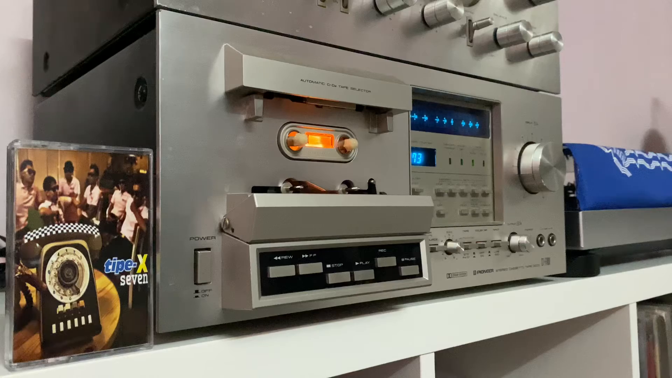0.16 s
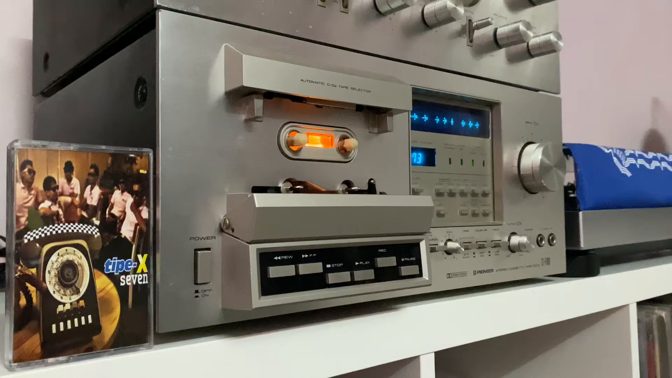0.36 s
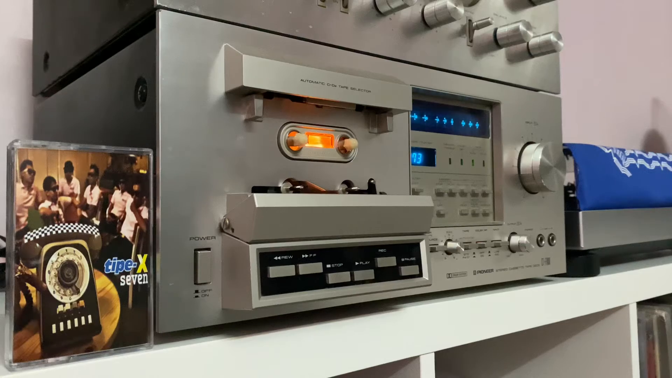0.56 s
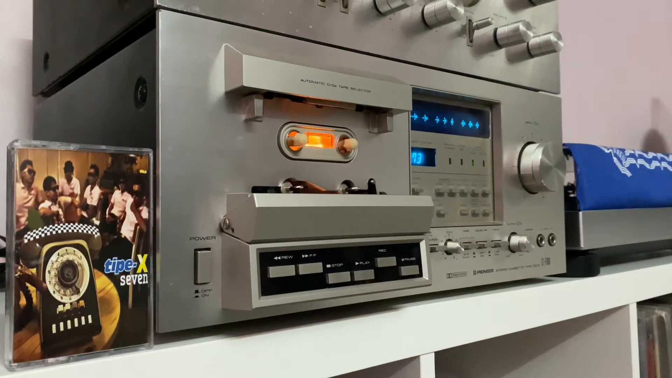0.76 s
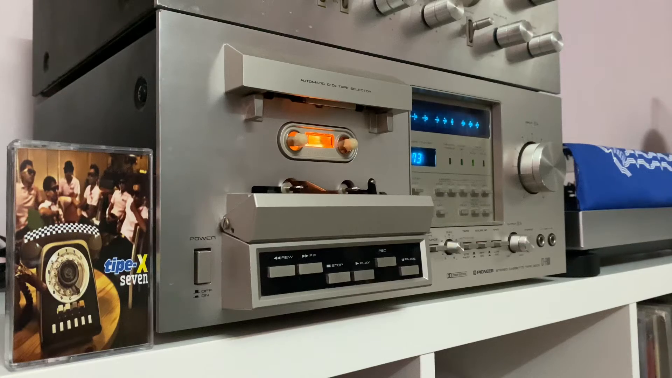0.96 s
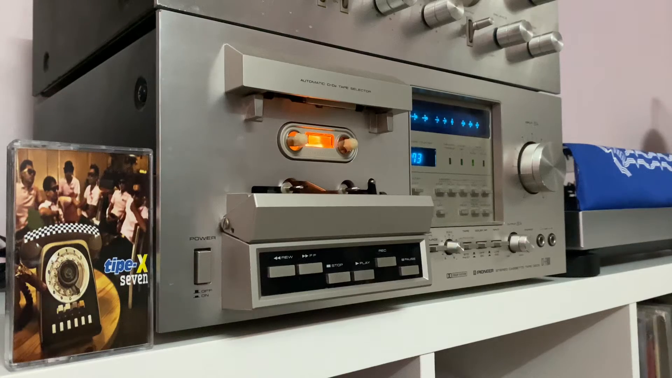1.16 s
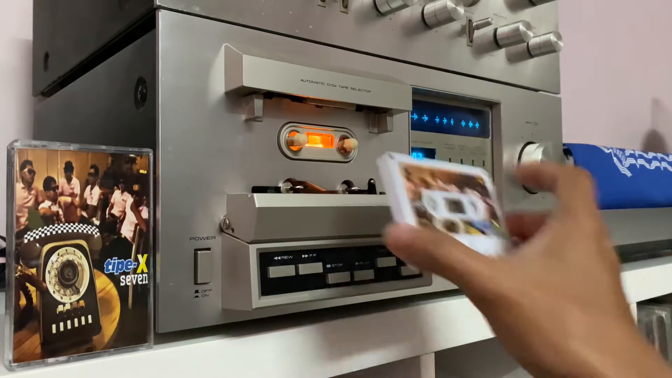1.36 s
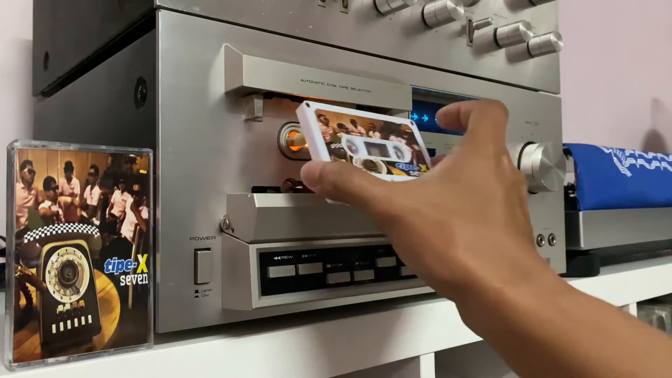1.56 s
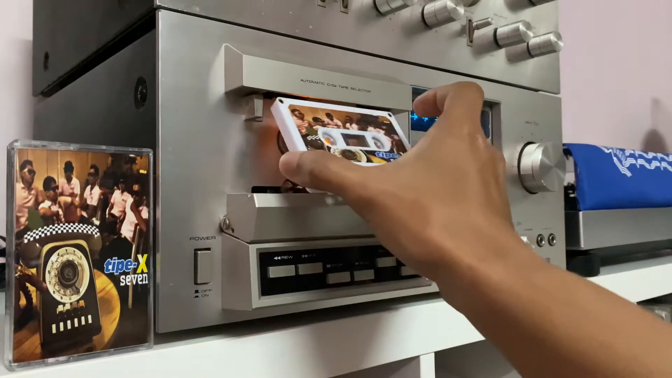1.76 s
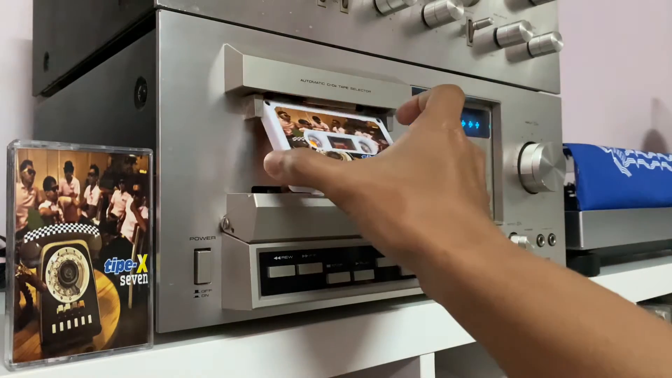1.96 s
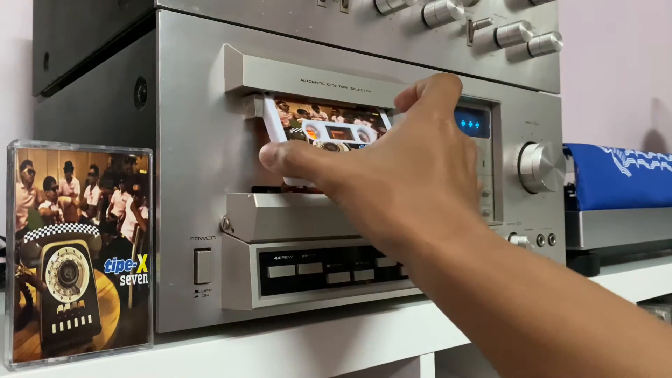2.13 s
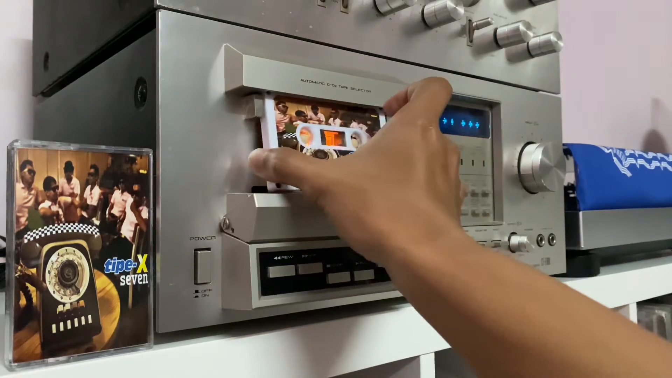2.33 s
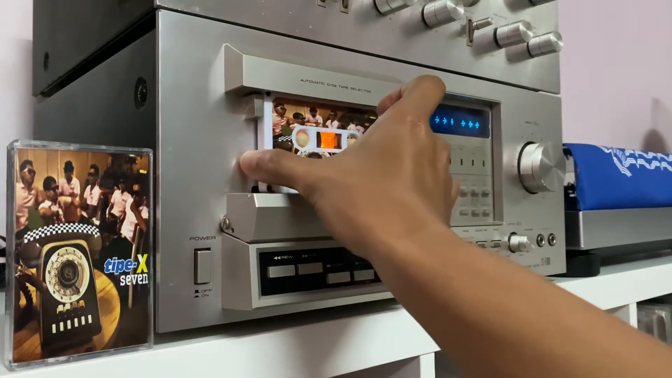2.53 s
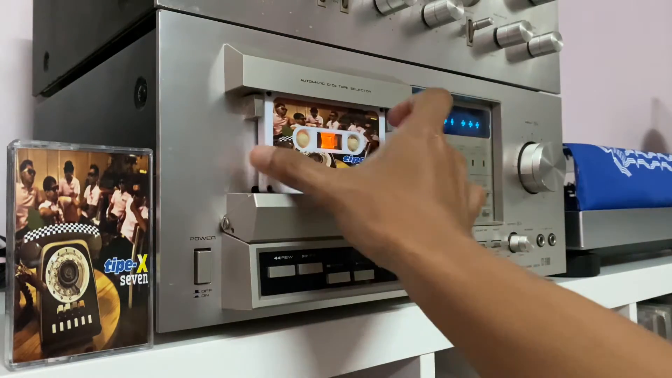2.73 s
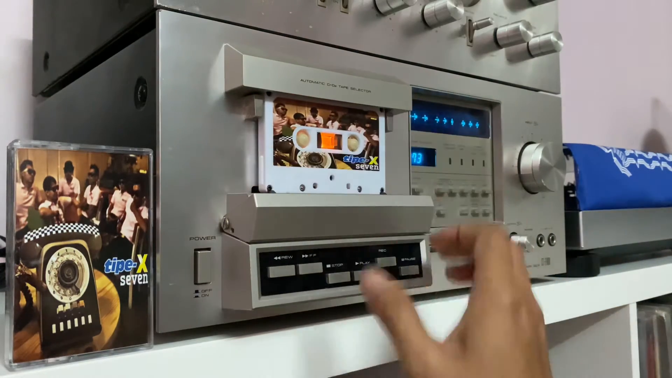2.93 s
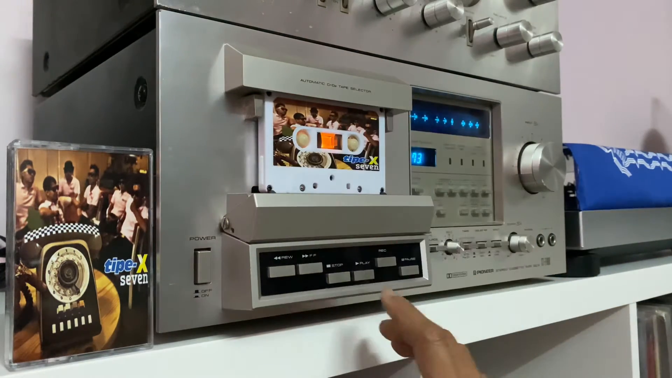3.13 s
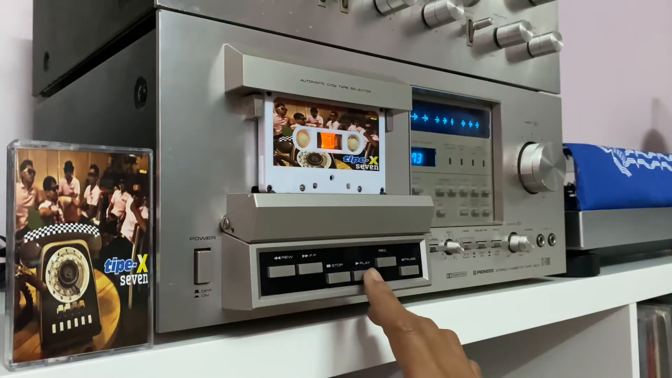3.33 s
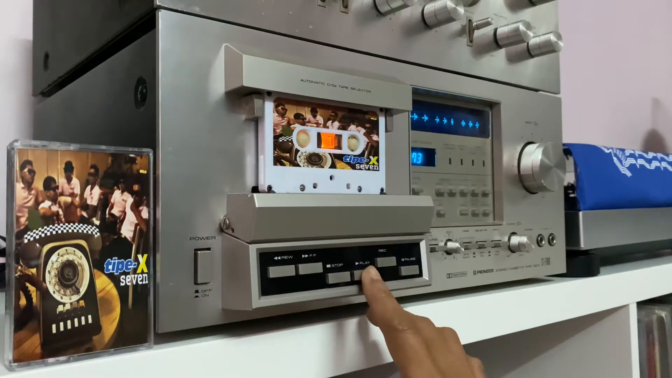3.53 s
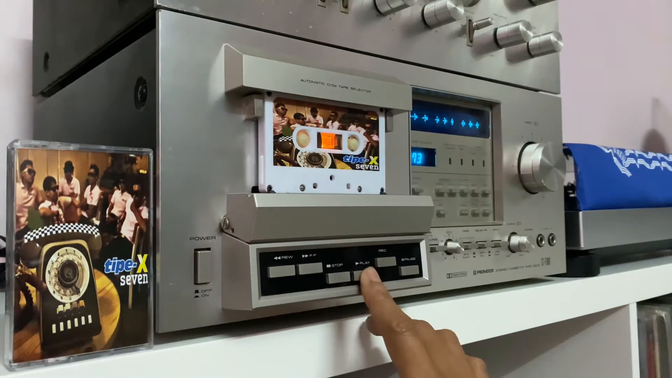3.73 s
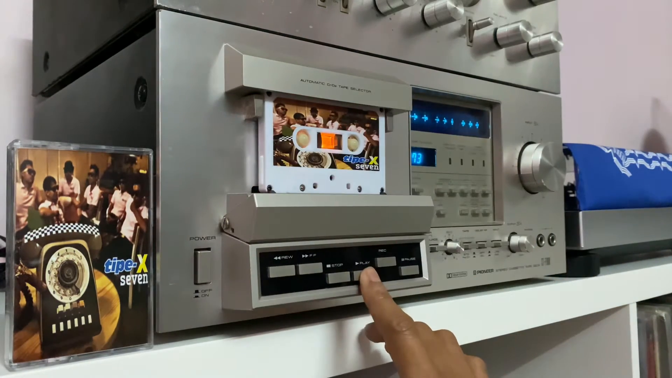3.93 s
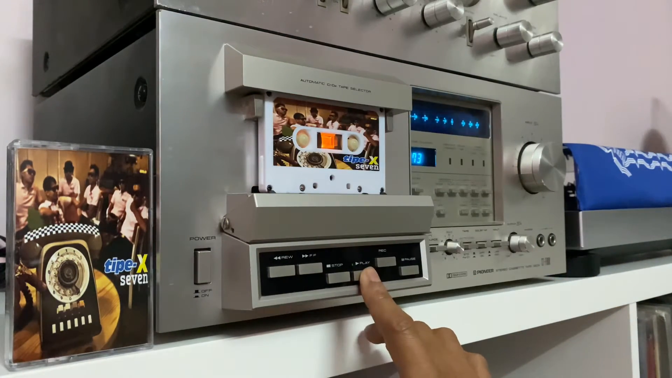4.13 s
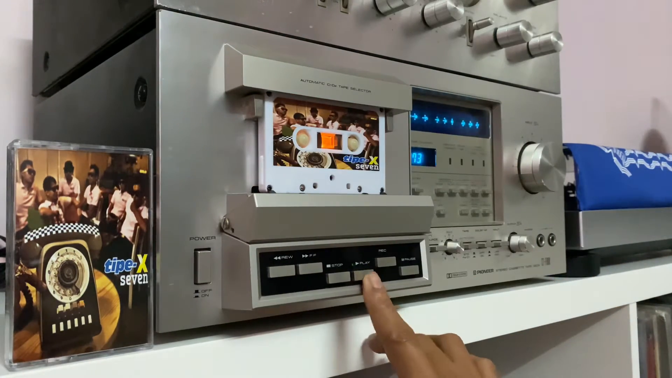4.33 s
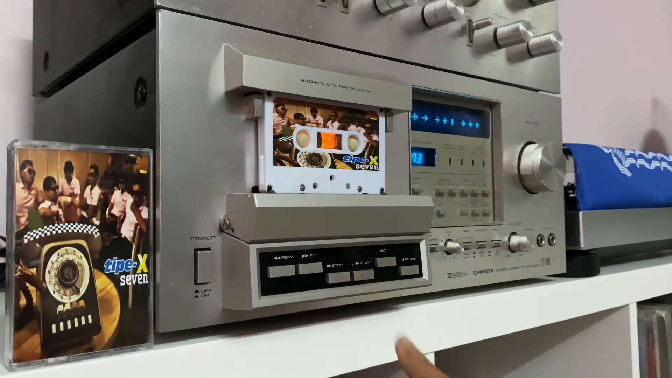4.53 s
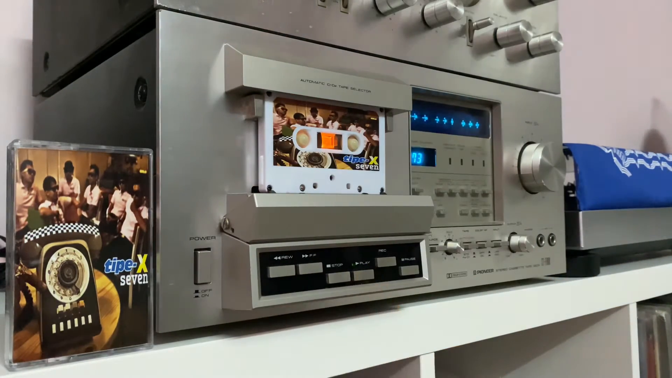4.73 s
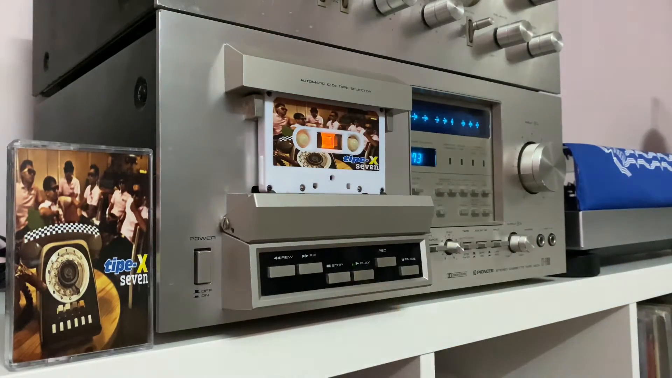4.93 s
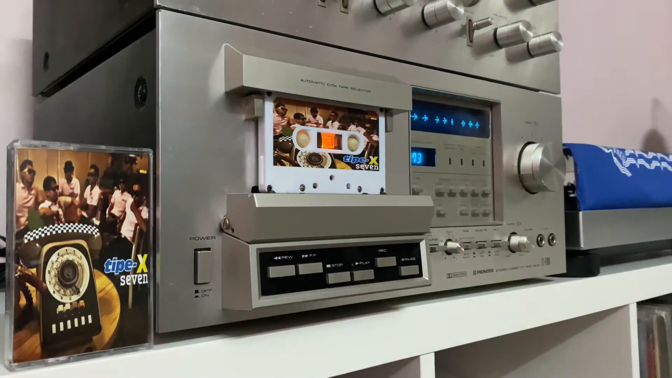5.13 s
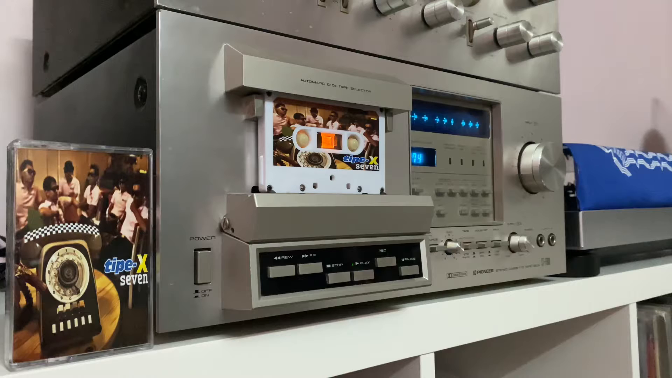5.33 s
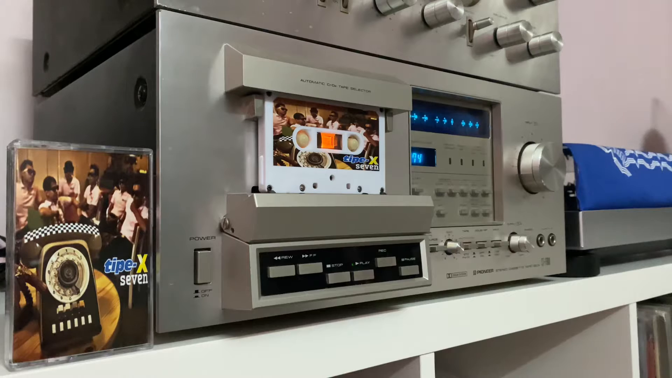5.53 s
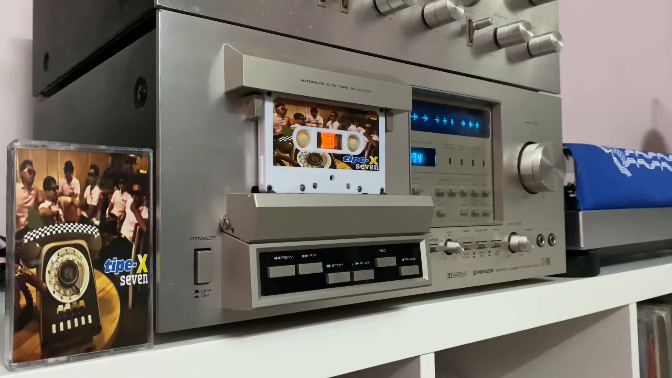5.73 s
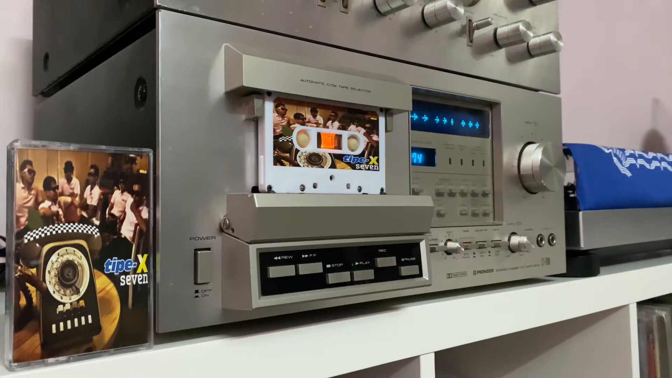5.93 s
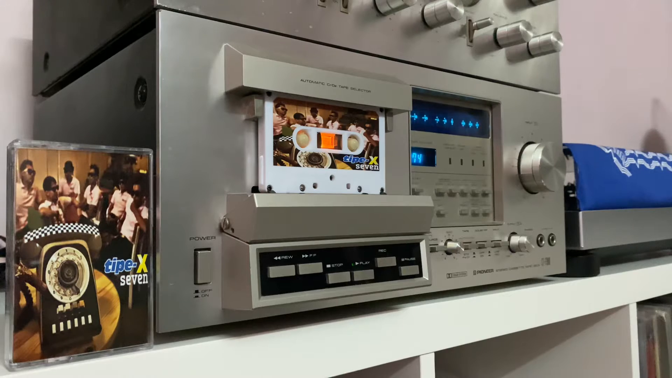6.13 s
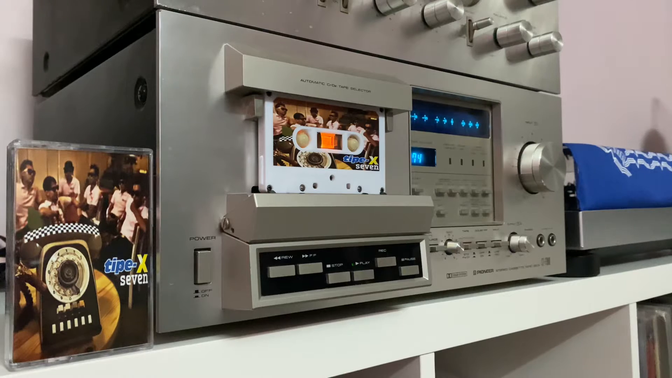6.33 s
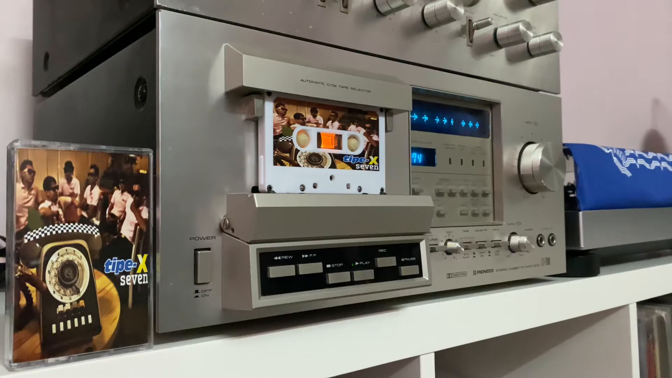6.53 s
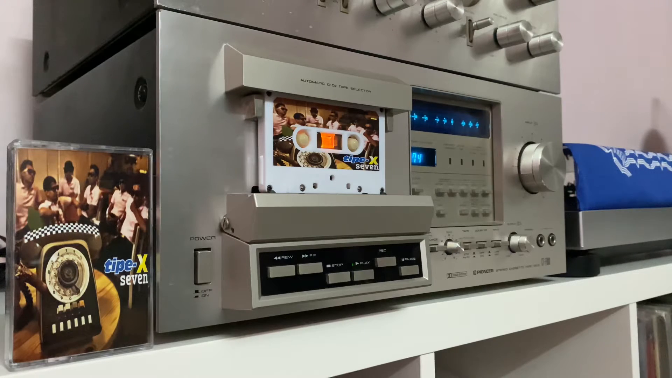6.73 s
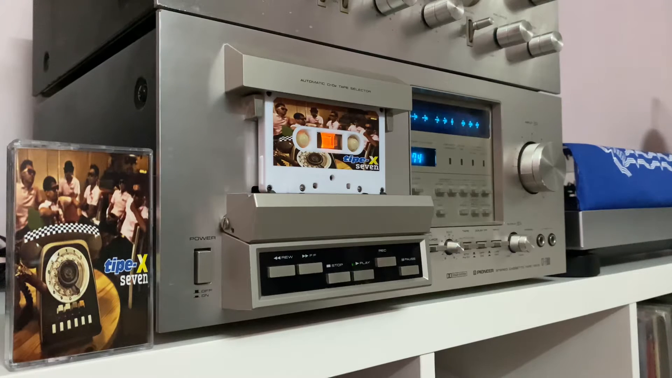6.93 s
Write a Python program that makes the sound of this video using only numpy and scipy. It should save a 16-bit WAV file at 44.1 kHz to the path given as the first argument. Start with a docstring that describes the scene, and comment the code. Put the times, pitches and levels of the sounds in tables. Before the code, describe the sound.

A plastic cassette clatters and snaps into a tape deck, a guard clunks, a key clacks down, then faint hiss and motor hum.

```python
"""A cassette is handled, slid into the open well of a tape deck and snapped home; a guard clunks shut,
a key is tapped, the head block is thrown in and tape hiss starts. Gritty pushes excite damped modes of
shell, parts, panel and cabinet; a decaying noise tail adds the small furnished room. Shaped noise gives
the low wavering rumble, murmur, hiss and motor tones. A phone close by hears it all."""
import sys
import numpy as np
from scipy import signal
from scipy.fft import rfft, irfft
from scipy.io import wavfile
from scipy.ndimage import uniform_filter1d

SR = 44100
rng = np.random.default_rng(int(sys.argv[2]) if len(sys.argv) > 2 else 0)


def put_to_file(sound):
    """Save the sound as 16-bit audio at rate SR, in the file named by the first command-line argument."""
    columns = np.atleast_2d(sound).T  # one column per channel
    safe = np.clip(columns, -1, 1)
    whole_steps = np.round(safe * 32767)
    wavfile.write(sys.argv[1], SR, whole_steps.astype(np.int16))


N = 307901
T = np.arange(N) / SR


def undb(db):
    """Level law: amplitude ratio from decibels."""
    return 10 ** (np.asarray(db) / 20)


def level(x, db):
    """Mean-square normalisation: scale to an RMS level in dB."""
    return x * undb(db) / np.sqrt(np.mean(x ** 2))


def filtered(x, order, edges_hz, kind="band"):
    """Butterworth filtering: a maximally flat pass band."""
    return signal.sosfilt(signal.butter(order, edges_hz, kind, fs=SR, output="sos"), x)


def balance(db):
    """Level difference between channels: left minus right in dB, split evenly."""
    return db * np.array([[.5], [-.5]])


def walk(rate):
    """Slow random modulation: levels held 1 / rate seconds and smoothed twice."""
    held = int(SR / rate)
    steps = np.repeat(rng.standard_normal(N // held + 1), held)
    return uniform_filter1d(uniform_filter1d(steps, held), held)[:N]


def noise(gain, alike_hz):
    """Spectral shaping of diffuse noise: left and right agree in the bass only."""
    hz = np.arange(N // 2 + 1) * SR / N + 1
    mid, side = rfft(rng.standard_normal((2, N))) * gain(hz)
    side = side * hz / (hz + alike_hz)
    return level(irfft(np.array([mid + side, mid - side]), N), 0)


def colour(table):
    """Spectral envelope: gain interpolated over log frequency from (Hz, dB) points."""
    hz, db = np.transpose(table)
    return lambda f: undb(np.interp(np.log(f), np.log(hz), db, left=-90, right=-90))


# Low background. Each row: time in seconds, rumble level in dB, murmur level in dB before its wander.
BACKGROUND_LEVELS = [(0.2, -101, -67), (0.25, -97, -68), (0.52, -73.5, -71), (0.97, -79, -65.5),
                     (1.27, -57, -64), (2.16, -72.5, -62.5), (2.39, -68, -57.5), (2.58, -60, -58.5),
                     (2.75, -74.5, -63.5), (2.969, -72, -67.5), (3.3, -77, -58), (3.541, -65, -67.5),
                     (3.981, -58, -64.5), (4.339, -78, -64), (4.58, -70, -62.5), (4.75, -74, -61.5),
                     (5.621, -58.5, -60), (6.07, -71, -61), (6.51, -57, -61.5), (6.98, -74, -60)]
# Murmur of the house. Each row: frequency in Hz, relative spectral density in dB.
HOUSE_COLOUR = [(41, -31.5), (70, -3.5), (119, -9.5), (184, -16), (300, -16), (357, -24.5), (398, -23.5),
                (575, -29), (1800, -50), (2340, -74.5), (3960, -120)]
# Steady thin hiss. Each row: frequency in Hz, relative spectral density in dB.
AIR_COLOUR = [(600, -20), (1200, 0), (2100, -3), (4100, -5), (6200, -10), (10000, -13), (12400, -14),
              (13500, -19), (16000, -25)]
AIR_DB = -86.5
RUMBLE_HZ, RUMBLE_WIDTH_HZ = 53, 13


def background():
    """Band-limited noise: a narrow rumble and a dull murmur swell separately over a steady hiss."""
    s, rumble_db, house_db = np.transpose(BACKGROUND_LEVELS)
    rumble = noise(lambda f: 1 / (1 + ((f - RUMBLE_HZ) / RUMBLE_WIDTH_HZ) ** 4), 170.0)
    house = noise(colour(HOUSE_COLOUR), 330.0)
    air = noise(colour(AIR_COLOUR), 690.0) * undb(AIR_DB)
    rumble = rumble * undb(np.interp(T, s, rumble_db))
    house = house * undb(np.interp(T, s, house_db) + walk(0.63))
    return rumble + house + air


SCATTER_DB = 2.  # random spread of each mode's strength
# Modes this far from a blow's own pitch lose 6 dB; the farthest lose no more than the second value.
FAVOURED_OCTAVES, FARTHEST_DB = .45, 9


def ring(modes, apart, swell=.0001, damp=1, near_hz=None, spread=0.0044):
    """Modal superposition: decaying sines, with strength, tuning and side phase drawn for each blow."""
    hz, db, t60 = np.transpose(modes)[:, :, None]
    t = T[:int(SR * t60.max())]
    share, drift, turn = rng.standard_normal((3, len(modes), 1))
    if near_hz:
        octaves_off = np.log2(hz / near_hz)
        db = db - np.minimum(6 * (octaves_off / FAVOURED_OCTAVES) ** 2, FARTHEST_DB)
    decay = undb(db + SCATTER_DB * share - 60 * damp * t / np.maximum(t60, .002))
    decay = decay * (1 - np.exp(-t / swell))
    phase = 2 * np.pi * hz * (1 + spread * drift) * t
    return np.array([np.sum(decay * np.sin(phase + side * apart * turn), 0) for side in (1, -1)])


GRIT_DB = 4.  # random spread of the roughness


def contact_grit(t):
    """Frictional excitation: rubbing surfaces exert a noise force of uneven strength."""
    return rng.standard_normal(len(t)) * undb(GRIT_DB * rng.standard_normal(len(t)))


HELD_SHARE = 0.12  # a contact is held for this share of its fade


def contact_push(t, grit, fade):
    """Force envelope: the gritty force rises, is held and then decays exponentially."""
    fade = max(fade, .004)
    hold = HELD_SHARE * fade
    after = np.maximum(t - hold, 0)
    rise = np.minimum(t / max(0.17 * hold, .0016), 1)
    return grit * rise * undb(-60 * after / fade)


BODY_PUSH_S = .0006  # time constant of the shove


def body_shove(t, grit):
    """Impulse excitation: the heavy body feels each contact as one short shove of random sign."""
    return np.exp(-t[:SR // 100] / BODY_PUSH_S) * np.sign(grit[0])


CRACK_HZ = (880, 6800)


def bare_crack():
    """Broadband impulse response: a click and its copy, the right side one sample late."""
    copy_delay = 3 * rng.integers(3)  # samples
    return filtered(np.eye(2, 200) + np.eye(2, 200, copy_delay), 1, CRACK_HZ)


THUD_HZ, THUD_T60_S = (148, 657), 0.15


def body_thud(t):
    """High modal density: the toneless part of the body's answer is decaying noise."""
    t = t[:SR // 10]
    burst = rng.standard_normal(len(t)) * undb(-60 * t / THUD_T60_S)
    return filtered(burst, 2, THUD_HZ) * np.ones((2, 1))


BUZZ_HZ, BUZZ_T60_S = (900, 9000), .3
BUZZ_UNEVEN_DB, BUZZ_STEP_S = 4., .006


def loose_buzz(t):
    """Irregular contact noise: loose parts buzz tonelessly and die away unevenly."""
    buzz = filtered(rng.standard_normal((2, len(t))), 1, BUZZ_HZ)
    steps = np.arange(0, t[-1], BUZZ_STEP_S)
    uneven_db = BUZZ_UNEVEN_DB * np.interp(t, steps, rng.standard_normal(len(steps)))
    return buzz * undb(uneven_db - 60 * t / BUZZ_T60_S) * (1 - np.exp(-t / .004))


# Nominal modes of five bodies; each blow scatters strength and tuning, and damping may shorten the decay.
# Plastic shell and its guides. Each row: frequency in Hz, relative level in dB, 60 dB decay in seconds.
SHELL_MODES = [(690, -13, .012), (817, -8, .012), (965, -5.5, 0.0057), (1115, -3, .02), (1330, -11, .012),
               (1428, 0, 0.0084), (1545, -3.5, 0.0083), (1724, -1.5, .01), (1910, -9, .012),
               (1984, -2, 0.011), (2268, -2.5, 0.01), (2560, -6.5, 0.01), (2710, -3, .007),
               (2937, -1.5, .006)]
# Small metal and plastic parts. Each row: frequency in Hz, relative level in dB, 60 dB decay in seconds.
PARTS_MODES = [(3170, -1, .004), (3450, -2, .004), (3850, -4, .003), (4300, -3, .003), (4850, -2, .004),
               (5400, -2, .003), (5900, -2, .003), (6380, -3, .004), (7000, -2, .003), (7600, -3, .003)]
# Thin edges and springs, barely ringing. Each row: frequency in Hz, relative level in dB,
# 60 dB decay in seconds (never played under 2 ms).
EDGES_MODES = [(8300, -1, 0.0017), (10150, 1, 0.002), (11130, -1.5, 0.002), (12300, -2.5, .002),
               (13400, -3.5, .003), (14800, -10, 0.002)]
# Front panel. Each row: frequency in Hz, relative level in dB, 60 dB decay in seconds.
PANEL_MODES = [(325, -13, 0.04), (361, -17, 0.2), (436, -10, 0.2), (495, 0, 0.24), (590, -8, 0.2),
               (672, -3, 0.17), (704, -7, 0.15), (797, -10, 0.15), (1080, -9, 0.17)]
# Deck cabinet on its shelf. Each row: frequency in Hz, relative level in dB, 60 dB decay in seconds.
CABINET_MODES = [(162, -9, 0.05), (212, -13, 0.2), (228, -9, 0.2), (248, 0, 0.42), (281, -13, 0.1)]
# Every contact, from a lone click to a short rattle. Each row: start in seconds, shell level in dB over
# its loudest 5 ms, favoured shell pitch in Hz, small parts in dB, favoured parts pitch in Hz, edges in dB,
# deck body in dB, fade as 60 dB decay in seconds (at least 4 ms).
# Parts, edges and body are relative to the shell.
CONTACT_EVENTS = [(0.829,-55,1620,-62,3660,-56,-23,0.022),(0.842,-65,1810,-47,3770,-39,-30,0.16),(1.057,-100,2900,28,4200,28.5,-9,0.034),(1.302,-67,2720,1.5,5400,-6,-28,0.022),
                  (1.315,-57,2820,4,5130,6.5,-30,0.0077),(1.32,-76.5,2380,15,5400,-4,-28,0.018),(1.427,-65,1040,-42,3720,-43,-12,0.014),(1.784,-62,2480,-4,3800,-28,-10,0.071),
                  (1.839,-37.5,1460,-10,4080,-15.5,-32,0.036),(1.862,-45.5,1370,-6.5,5750,-5,-13,0.073),(1.887,-46,1150,-35,5000,-16,-13,0.011),(1.917,-49.5,1280,-7,3230,-27,-13.5,0.062),
                  (2.046,-47.5,2400,-7,5170,-5,-14.5,0.11),(2.06,-48,1450,-3.5,4400,-10,-16,0.068),(2.179,-41.5,1380,-6,3900,-22.5,-8,0.022),
                  (2.218,-34.5,1400,-16,4300,-26,-23.5,0.024),(2.254,-50.5,1280,-5,5470,-10.5,-6.5,0.16),(2.27,-54,2510,8,3700,2.5,-22.5,0.021),(2.281,-51,2770,-5.5,4440,-8.5,-18,0.032),
                  (2.293,-54,2180,-17.5,4520,-13,-9,0.057),(2.358,-38.5,1400,-10,6150,-12,-24.5,0.013),(2.363,-41,1580,-2.5,5900,-1,-16,0.02),(2.378,-37.5,2594,1.5,5175,-6.5,-28,0.031),
                  (2.392,-33,2133,-10.5,5290,-14,-22,0.029),(2.397,-32,1451,-3.5,5470,-8.5,-25,0.02),(2.406,-34,1910,-2,5330,-10,-29,0.1),(2.416,-26,1300,1,6100,-1,-23.5,0.021),
                  (2.42,-35,1660,-6,6000,-6,-19.5,0.16),(2.639,-63.5,1220,-10,5200,-25,-5,0.026),(2.677,-68.5,1700,7,4640,-24,0.5,0.031),(2.689,-63.5,1560,2.5,4600,-20,1.5,0.037),
                  (3.123,-75,1890,6,3820,-13,2.5,0.15),(3.153,-41.5,2150,-6,4920,-9.5,-24,0.29),(3.16,-39.5,2690,-1.5,5820,-2.5,-14,0.017),(3.164,-39,2520,1.5,5100,-19.5,-12,0.026),
                  (3.173,-35,1530,-6,5000,-17.5,-9.5,0.0073),(3.182,-33,2670,-28.5,5200,-11.5,-13.5,0.017),(3.194,-41,1540,-19.5,5250,-31,-7.5,0.039),(3.37,-65.5,2730,-6.5,5100,-28,-24,0.017),
                  (3.556,-78.5,1870,-2,5320,-22,-8.5,0.032),(3.677,-43.5,2400,-7,4000,-18,-42.5,0.0106),(3.685,-72.5,2010,5.5,3610,-19,-31.5,0.13),(3.859,-82.5,2290,7.5,5010,-13,2.5,0.31),
                  (4.022,-56,1320,-7,4300,-9.5,-11.5,0.32),(4.032,-53.5,2150,5.5,4000,3.5,-14,0.061),(4.045,-50.5,1230,-12,5270,-12,0.5,0.055),(4.055,-45,2560,-2,6450,3,-10,0.064),
                  (4.06,-37.5,2500,-15.5,5250,-6.5,-13.5,0.11),(4.079,-29.5,1960,-14,5460,-17,-19.5,0.04),(4.09,-35,1910,5.5,5300,6,-6.5,0.016),(4.096,-43,1300,-14.5,5300,-5,-1,0.2),
                  (4.243,-54,1270,-13.5,4940,-23.5,-15,0.033),(4.281,-65.5,1780,-8,5030,-24.5,-4.5,0.062),(4.325,-72,2340,-3,5300,-16,-13.5,0.026),(5.958,-68,717,-30.5,6310,-21,-2,0.027)]
CABINET_DB = -12.5  # cabinet over the deck body, for a shell level of FIRM_DB
CABINET_DB_PER_DB, FIRM_DB = 1.23, -44.5  # harder blows reach further into the cabinet
CRACK_DB = -2.5  # relative to the shell, lowered further where the small parts are weak
THUD_DB = 2.5  # relative to the deck body
BUZZ_DB = -23.5  # relative to the shell, lowered further where the small parts are weak
HEAD_THROWN_S, CLAMPED_DAMP = 4.0, 2.9  # the thrown head block stiffens and damps the chassis
METAL_PANEL_DB = 2.5  # the head block is mounted on the front panel
# Left minus right: the cassette comes from the right, the well is to the left,
# the bulk of the cabinet to the right.
HAND_PAN_DB, DECK_PAN_DB, CABINET_PAN_DB = -3, 2.5, -4
REACHES_DECK_S = 1.6
DECK_LOW_HZ = 112


def knocks():
    """Source-filter principle: each contact's force is convolved with every body's response."""
    out, t = np.zeros((2, N + SR)), T[:SR // 3]
    for s, shell_db, shell_hz, parts_db, parts_hz, edges_db, body_db, fade in CONTACT_EVENTS:
        at = int(s * SR)
        thrown = s > HEAD_THROWN_S
        damp = CLAMPED_DAMP if thrown else 1
        pan = balance(HAND_PAN_DB if s < REACHES_DECK_S else DECK_PAN_DB)
        weak_parts_db = min(parts_db, 0)
        grit = contact_grit(t)
        push = contact_push(t, grit, fade)
        shove = body_shove(t, grit)

        crack = bare_crack()
        thud = body_thud(t)
        panel_db = body_db + thrown * METAL_PANEL_DB
        cabinet_db = body_db + CABINET_DB + CABINET_DB_PER_DB * (shell_db - FIRM_DB)
        cabinet = ring(CABINET_MODES, 0.15, 0.013, damp, spread=.006)
        cabinet = cabinet * undb(balance(CABINET_PAN_DB - DECK_PAN_DB))
        layers = [
            (push, ring(SHELL_MODES, 1.0, 0.00025, near_hz=shell_hz), 0),
            (push, ring(PARTS_MODES, 0.21, near_hz=parts_hz), parts_db),
            (push, ring(EDGES_MODES, 0.03), edges_db),
            (shove, ring(PANEL_MODES, 0.58, 0.0044, damp), panel_db),
            (shove, cabinet, cabinet_db),
            (push, thud, body_db + THUD_DB),
            (push, crack, CRACK_DB + 1.1 * weak_parts_db),
        ]
        for force, response, db in layers:
            sound = signal.fftconvolve(response, force[None], axes=1)
            power = uniform_filter1d(np.mean(sound ** 2, 0), SR // 200)  # over five milliseconds
            loudest = np.sqrt(power.max())
            out[:, at:at + sound.shape[1]] += sound / loudest * undb(shell_db + db + pan)

        buzz_db = shell_db + BUZZ_DB + weak_parts_db / 2
        out[:, at:at + len(t)] += loose_buzz(t) * undb(buzz_db + pan)
    # the knocks carry no deep bass
    return filtered(out[:, :N], 2, DECK_LOW_HZ, "high")


# Reverberation. Each row: frequency in Hz, 60 dB decay in seconds.
ROOM_DECAY = [(200, 0.18), (1000, 0.1), (4000, 0.29), (12000, 0.014)]
ROOM_DB = -6.5


def room(hits):
    """Diffuse reverberation: walls and shelves return a noise tail, each octave dying at its own rate."""
    t, tail = T[:SR // 2], 0
    hz, t60 = np.transpose(ROOM_DECAY)
    for centre in 125 * 2. ** np.arange(8):
        edges_hz = [centre / np.sqrt(2), min(centre * np.sqrt(2), SR / 2.1)]
        fall = undb(-60 * t / np.interp(np.log(centre), np.log(hz), t60))
        mid, side = filtered(rng.standard_normal((2, len(t))), 2, edges_hz) * fall
        tail = tail + mid + min(centre / 3300.0, 1) * side * np.array([[1], [-1]])
    tail = tail * (1 - np.exp(-(t / 0.0012) ** 2))  # the first echoes take a few milliseconds
    tail = tail / np.sqrt(np.sum(tail ** 2) / 2)
    return undb(ROOM_DB) * signal.fftconvolve(hits.mean(0)[None], tail, axes=1)[:, :N]


# Low ring pulsing during and after the hardest blows. Each row: start in seconds,
# cabinet peak in dB before panning, panel peak relative to it in dB, damping as a factor on the decay rate.
PULSE_EVENTS = [(2.416, -40.5, -10, 3.0), (2.449, -31, -12.5, 1.9), (2.501, -39, -12.5, 1.3),
                (3.167, -45.5, 3, 2.5), (3.2, -34, 3, 2.0), (3.238, -38.5, -5.5, 2.0),
                (3.266, -43, -2, 1.4), (4.047, -47, -1, 2), (4.096, -31, 0, 3.0), (4.13, -37.5, 0, 2.5),
                (4.18, -47.5, -4, 1.8)]
PULSE_SWELL_S = .006


def cabinet_pulses():
    """Damped modal ringing: low cabinet and panel pulses swell, each fading as the next begins."""
    out = np.zeros((2, N + SR))
    next_starts = [row[0] for row in PULSE_EVENTS[1:]] + [T[-1]]
    for (s, peak_db, panel_db, damp), until in zip(PULSE_EVENTS, next_starts):
        at = int(s * SR)
        for modes, db, pan_db in ((CABINET_MODES, 0, CABINET_PAN_DB), (PANEL_MODES, panel_db, 0)):
            sound = ring(modes, 0.53, PULSE_SWELL_S, damp, spread=0.007)
            overlap = np.maximum(T[:sound.shape[1]] + s - until, 0)
            sound = sound * np.exp(-overlap / PULSE_SWELL_S)
            gain = undb(peak_db + db + balance(pan_db))
            out[:, at:at + sound.shape[1]] += sound / np.abs(sound).max() * gain
    return out[:, :N]


# Spectrum of the tape hiss. Each row: frequency in Hz, relative spectral density in dB.
HISS_COLOUR = [(900, -30), (1600, -16), (2600, -16), (3600, -9), (5000, -6), (7000, -9), (8100, -7),
               (9000, -14), (10200, -9), (12200, -7), (14300, -2), (15300, -5), (15750, -8), (15950, -40)]
# Hiss, faint while the head meets the leader, full once coated tape arrives.
# Each row: time in seconds, level in dB before its small wander.
HISS_LEVELS = [(4.1, -110), (4.2, -73), (4.5, -83.5), (4.53, -68), (6.98, -69.5)]


def tape_hiss():
    """Broadband noise: smooth hiss from the speakers, its middle band wavering a little."""
    hiss = noise(colour(HISS_COLOUR), 3000.0)
    hiss = hiss * undb(np.interp(T, *np.transpose(HISS_LEVELS)) + .5 * walk(2.3))
    mids = filtered(hiss, 2, [1200, 6000])
    return hiss + mids * (undb(1.5 * walk(5.0)) - 1)


# Faint steady treble bands. Each row: centre in Hz, width in Hz, relative level in dB.
TREBLE_BANDS = [(5160, 540, 4.5), (7750, 690, 6), (8700, 370, 4)]
TREBLE_BANDS_DB = -93


def treble_bands():
    """Narrow-band noise: faint steady bands around 5, 8 and 9 kHz while the tape hiss sounds."""
    def gain(f):
        return sum(undb(db) / (1 + (2 * (f - hz) / width) ** 4) for hz, width, db in TREBLE_BANDS)
    return noise(gain, 900.) * undb(TREBLE_BANDS_DB) * (T > HISS_LEVELS[0][0])


# Slightly wavering tones of the running transport. Each row: frequency in Hz, width in Hz, level in dB.
MOTOR_TONES = [(51.67, 1.8, -60), (98.7, 3.6, -70.5), (250, 7.2, -72.5), (516, 13, -78.5), (885, 6.9, -87),
               (1050, 19, -91.5)]
MOTOR_ON_S, MOTOR_RISE_S = 4.5, 0.11


def motor():
    """Narrow-band noise: finite line width makes the running transport's tones waver."""
    tones = 0
    for hz, width, db in MOTOR_TONES:
        tones = tones + noise(lambda f: 1 / (1 + (2 * (f - hz) / width) ** 2), 440.0) * undb(db)
    return tones * np.clip((T - MOTOR_ON_S) / MOTOR_RISE_S, 0, 1)


def scene():
    """Linear superposition: all sources and the room's answer to the contacts add at the phone."""
    hits = knocks()
    deck = hits + room(hits) + cabinet_pulses()
    return deck + background() + tape_hiss() + treble_bands() + motor()


PORT_FROM_HZ, PORT_ZERO_HZ, PORT_TURN_HZ = 6000, 6900, 4170  # crossover, in-phase point, half-turn span
START_S, TOP_HZ = .065, 16500  # silent before the first, low-passed at the second


def record(dry):
    """Interchannel delay: the phone's treble is one signal, a quarter millisecond late on the left."""
    hz = np.arange(N // 2 + 1) * SR / N
    both = rfft(dry)
    treble_share = 1 / (1 + (PORT_FROM_HZ / (hz + 1)) ** 16)
    turn = np.exp(1j * np.pi * (hz - PORT_ZERO_HZ) / PORT_TURN_HZ * np.array([[-1], [1]]))
    treble = both[0] * turn + 0.029 * both[1]
    sound = irfft(both * np.sqrt(1 - treble_share ** 2) + treble_share * treble, N)
    sound = sound * (T > START_S)
    return signal.sosfilt(signal.ellip(10, .2, 80, TOP_HZ, fs=SR, output="sos"), sound)


dry = scene()
out = record(dry)
put_to_file(out)
```